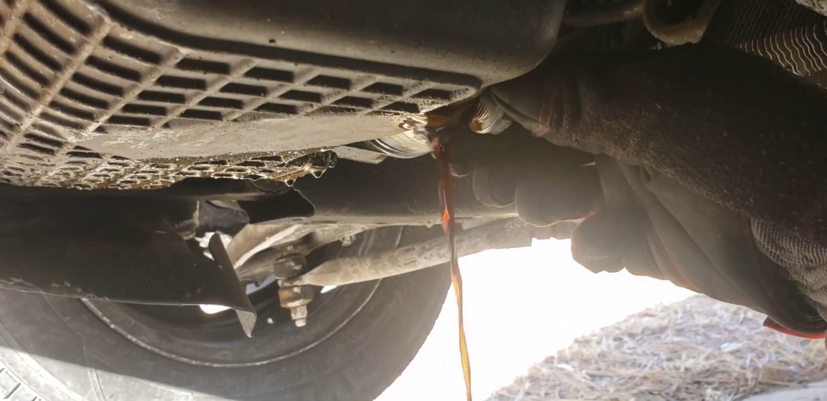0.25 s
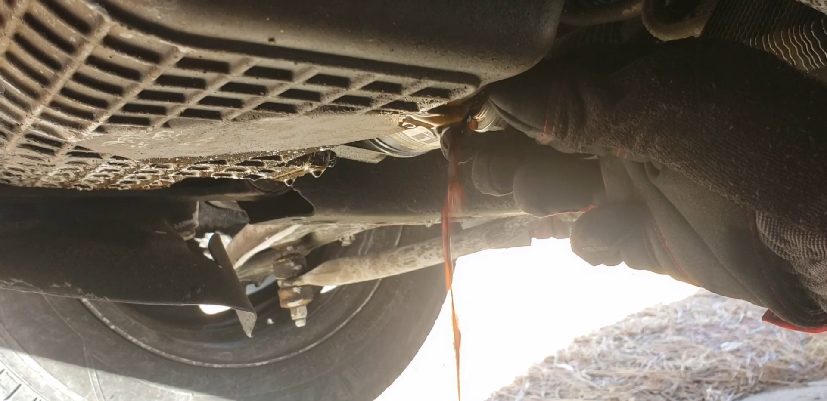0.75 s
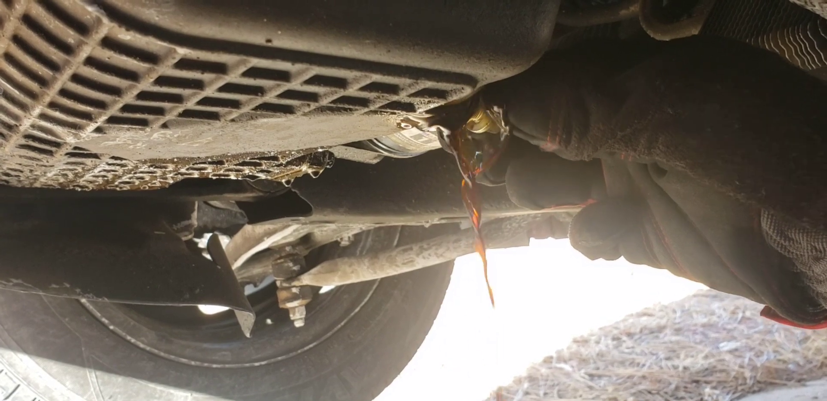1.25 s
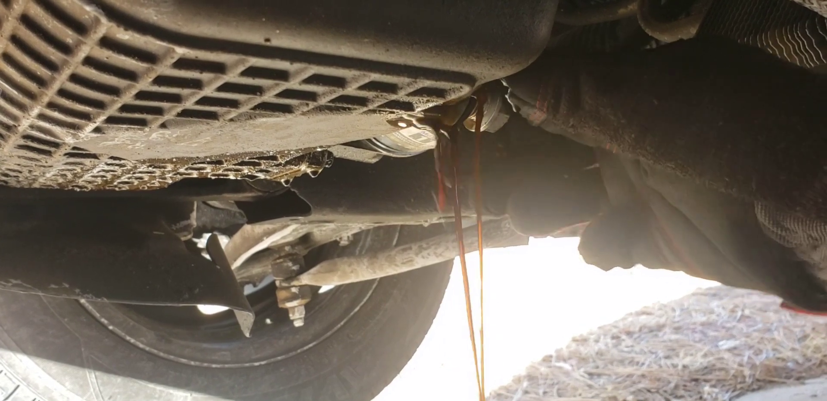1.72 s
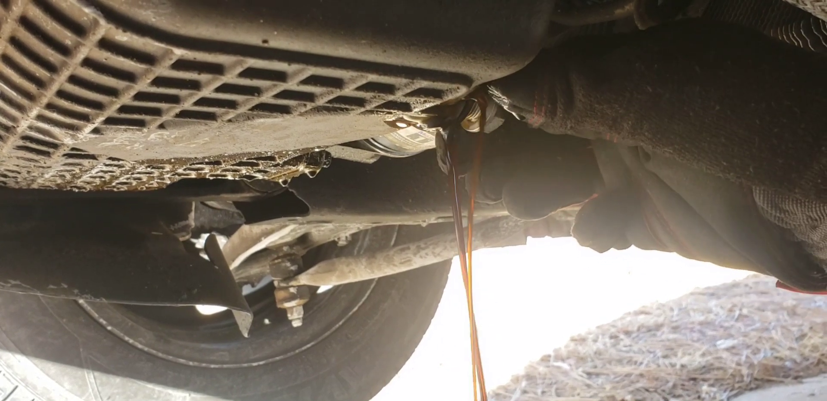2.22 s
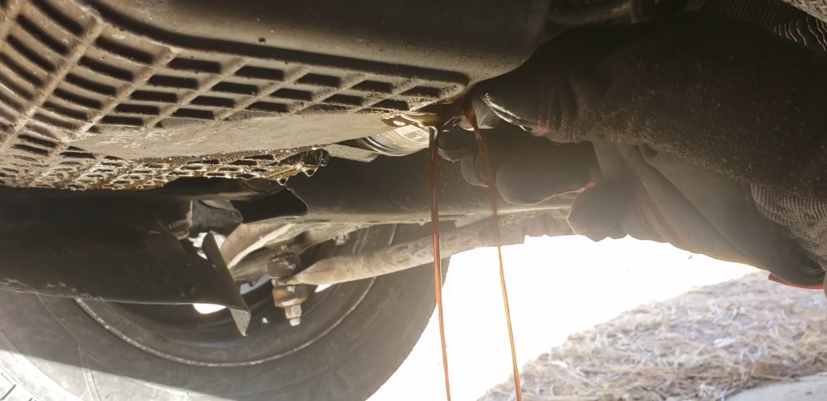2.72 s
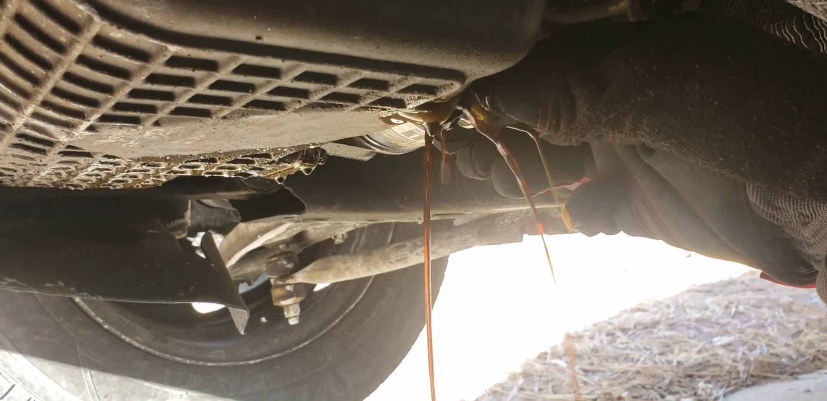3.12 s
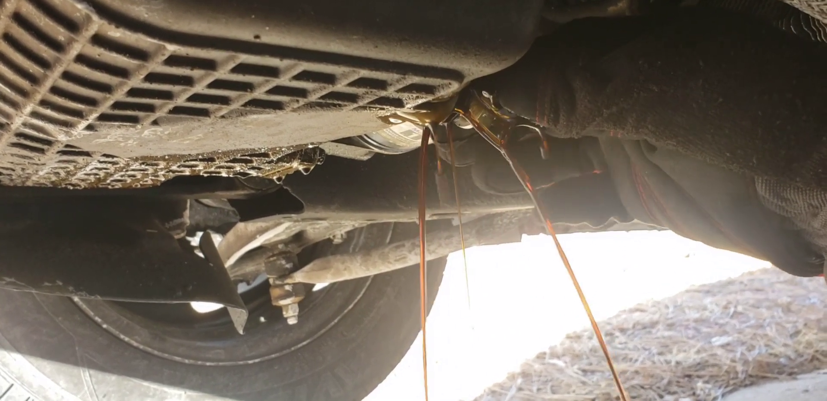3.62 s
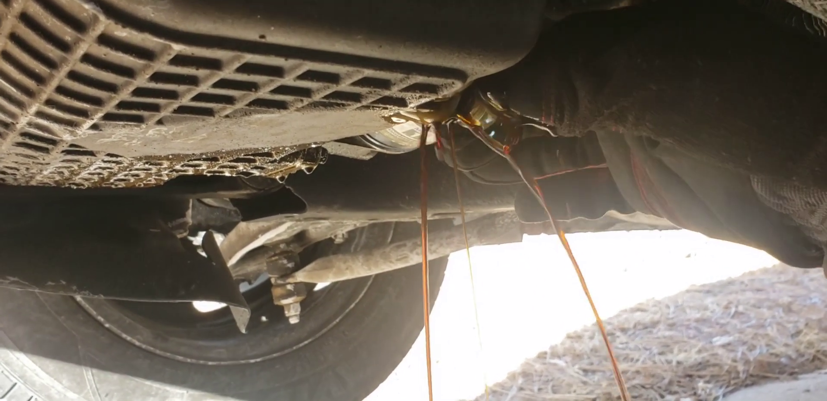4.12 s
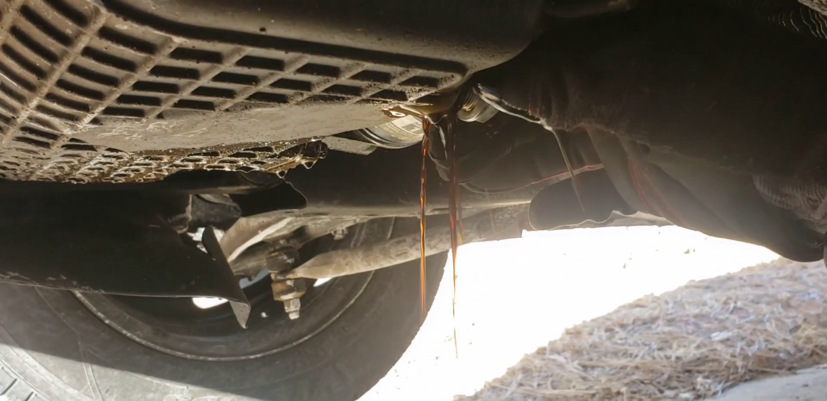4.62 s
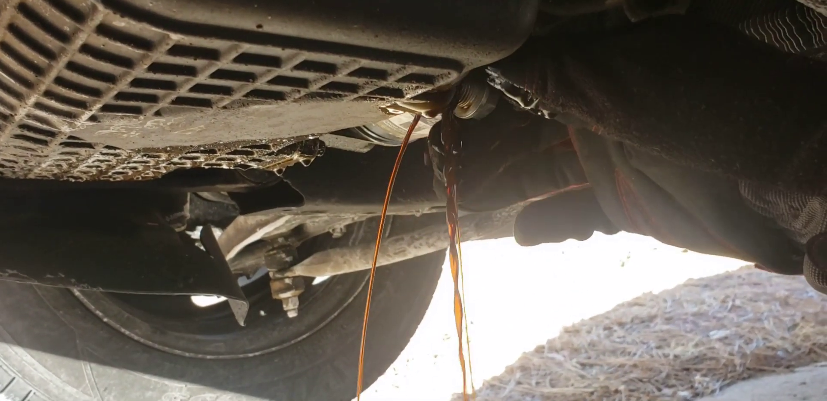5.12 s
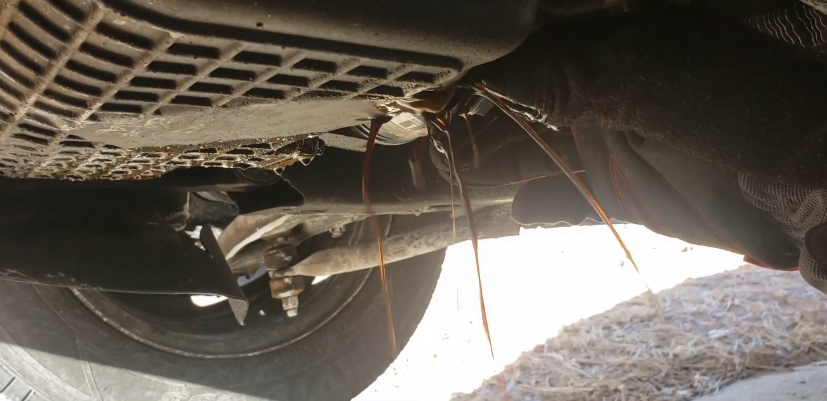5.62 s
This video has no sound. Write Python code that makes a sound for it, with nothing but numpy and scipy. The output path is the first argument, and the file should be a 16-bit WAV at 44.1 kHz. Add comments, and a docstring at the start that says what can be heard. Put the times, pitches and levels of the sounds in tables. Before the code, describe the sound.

Heard close under a car outdoors, warm oil falls in broken threads into a plastic catch pan: crisp crackle, sharp wet splats, tiny rising bubbles and dull hollow plops. Low wind rumble swells on the right microphone, peaking near 1.5 seconds and stopping abruptly. The dribble then thins, exposing single ticks and plips, before livelier splatter and bubbling return after 4.5 seconds.

```python
"""Oil draining into a catch pan

Warm oil streams from a car's drain hole into a pan, heard from under the car at a left and a right port.
Shaped noise bursts make the splats and crackle, short rising tones the bubbles, and damped modes the pan;
dense echoes stand for underbody and ground. Filtered noise makes a whistle, a faint background and the
wind, which rumbles on both ports and buffets the right one hardest early on."""
import sys
import numpy as np
from scipy import signal
from scipy.fft import rfft, irfft, next_fast_len
from scipy.io import wavfile
from scipy.ndimage import uniform_filter1d, map_coordinates

SR = 44100
rng = np.random.default_rng(int(sys.argv[2]) if len(sys.argv) > 2 else 0)


def wav_out(sig):
    """Save sig, one row per channel (or a flat mono array), as 16-bit PCM at SR to the path in sys.argv[1]."""
    wavfile.write(sys.argv[1], SR, np.round(np.clip(np.atleast_2d(sig).T, -1, 1) * 32767).astype(np.int16))


N = 258101
T = np.arange(N) / SR

# Table levels are nominal: each layer adds its own gain and echoes.
# strength of the stream's spray: (time [s], level [dB])
FLOW = [(0, -47.5), (.35, -59.5), (.58, -48.5), (.77, -52), (1.0, -53.5), (1.35, -55.5), (1.85, -60.5),
        (2.35, -61.5), (2.75, -57.5), (3.7, -57), (4.4, -53.5), (4.8, -55.5), (5.2, -54), (5.85, -61)]
# spectrum of the spray: (frequency [Hz], level [dB])
SPRAY_COLOUR = [(1800, -27), (2800, -18), (4200, -8), (5500, 1.5), (7000, -5), (8600, -15), (10000, 2.5),
                (12200, 8.5), (14000, -3), (16000, -2)]
# the biggest lumps of oil landing: (time [s], level [dB], brightest pitch [Hz])
SPLATS = [(0.02, -45, 5750), (0.062, -32, 12300), (0.181, -42, 6340), (0.196, -37, 7750),
          (0.219, -36, 13400), (0.333, -39.5, 6200), (0.423, -31, 10500), (0.516, -30.5, 13100),
          (0.547, -30, 12700), (0.618, -24.5, 15700), (0.635, -28, 6500), (0.669, -25.5, 14600),
          (0.7065, -30, 5400), (0.7303, -31, 10500), (0.76, -31.5, 12600), (0.784, -29, 12100),
          (0.86, -35, 12200), (0.926, -34, 12200), (1.029, -35.5, 10000), (1.12, -30, 12600),
          (1.157, -25, 14200), (1.201, -33, 10900), (1.227, -37.5, 9700), (1.36, -29.5, 11300),
          (1.3873, -24, 12700), (1.521, -36.5, 11800), (1.534, -36, 7200), (1.566, -34, 10700),
          (1.643, -29.5, 11800), (1.689, -36, 5430), (1.85, -41, 10800), (1.8851, -27.5, 17300),
          (1.994, -32.5, 7200), (2.088, -33, 12900), (2.13, -39.5, 11600), (2.2192, -34.5, 7560),
          (2.298, -30.5, 10500), (2.49, -39.5, 8000), (2.529, -38, 14600), (2.625, -41, 12200),
          (2.695, -37.5, 5900), (2.742, -35.5, 5440), (3.132, -34, 12800), (3.198, -39.5, 7000),
          (3.2214, -30.5, 11800), (3.339, -38, 6720), (3.381, -34, 12400), (3.447, -31.5, 12400),
          (3.476, -34.5, 10500), (3.491, -40, 10300), (3.5427, -35, 12600), (3.604, -37, 13200),
          (3.692, -33, 13400), (3.818, -34, 12200), (3.836, -40, 12100), (3.884, -38, 14100),
          (3.922, -41.5, 5530), (3.988, -41, 11950), (4.0065, -32, 12300), (4.1183, -35.5, 7100),
          (4.27, -28, 15200), (4.294, -27.5, 10000), (4.3917, -33, 10800), (4.403, -34, 11000),
          (4.442, -35, 7300), (4.473, -33.5, 12500), (4.5987, -26, 10300), (4.615, -31.5, 12400),
          (4.675, -32, 13700), (4.704, -38, 11800), (4.751, -33.5, 11000), (4.779, -37, 11700),
          (4.8116, -33, 12900), (4.895, -35, 5400), (4.912, -25.5, 14100), (4.934, -32.5, 11400),
          (4.952, -32, 11600), (4.974, -32, 15100), (5.016, -34, 11000), (5.115, -36, 12600),
          (5.21, -35, 12900), (5.252, -26, 7260), (5.414, -35, 8450), (5.456, -39, 6600),
          (5.475, -25, 11700), (5.544, -37, 13900), (5.647, -25, 13600), (5.703, -34.5, 8800),
          (5.7458, -32.5, 11800)]
# the stream lands to the right at first, then settles near the middle (left minus right)
START_PAN_DB, END_PAN_DB, SETTLE_S = -6.5, -1, 1.8
# the patter eases slightly ahead of each big splat or bubble
DIP_DB, DIP_S = -1, 0.075
# the stream breaks and little reaches the pool: (time [s], half length [s], depth [dB])
BREAKS = [(0.783, 0.16, -2), (1.342, 0.068, -26), (1.843, 0.054, -17), (2.362, 0.049, -6.5),
          (3.005, 0.37, -5.5), (3.47, 0.052, -8), (3.767, 0.067, -11.5), (4.867, 0.06, -14),
          (5.32, 0.026, -6), (5.747, 0.0067, -16)]

# the biggest bubbles bursting in the pool: (time [s], level [dB], starting pitch [Hz])
BUBBLES = [(0.063, -42, 2000), (0.456, -34.5, 4570), (0.518, -43.5, 1780), (0.587, -46.5, 2580),
           (0.636, -38, 1900), (0.638, -40.5, 4330), (0.709, -33, 5260), (0.882, -35, 1710),
           (0.906, -41, 2200), (0.922, -41, 2035), (0.991, -27.5, 4960), (1.0918, -29.5, 4060),
           (1.16, -38, 3980), (1.277, -37, 5700), (1.36, -37.5, 4370), (1.5992, -36.5, 4810),
           (1.644, -40, 2010), (1.718, -39, 4460), (2.05, -43.5, 1810), (2.3005, -39, 5230),
           (2.347, -44.5, 4970), (2.403, -46, 1880), (2.6127, -43.5, 1840), (2.696, -49, 2750),
           (2.72, -47, 1810), (2.773, -39, 1750), (2.847, -43.5, 1780), (3.0225, -48, 1650),
           (3.1232, -42, 2540), (3.1688, -41, 1660), (3.2183, -41, 1840), (3.219, -39.5, 3340),
           (3.3419, -45.5, 1850), (3.4495, -44.5, 1890), (3.5652, -40.5, 1760), (3.607, -40.5, 2030),
           (3.696, -39, 5350), (3.844, -48, 1850), (3.8611, -41, 5260), (3.892, -35, 3520),
           (4.547, -42, 1900), (4.562, -45, 2380), (4.599, -38.5, 4050), (4.633, -40, 4730),
           (4.6843, -44, 2360), (4.7512, -44, 1720), (4.779, -42, 2530), (4.897, -43, 4200),
           (4.9548, -34, 5480), (5.0163, -34.5, 3430), (5.115, -34.5, 2550), (5.1559, -39, 3250),
           (5.196, -43, 1800), (5.2166, -36.5, 1790), (5.353, -48, 1850), (5.3711, -35, 3480),
           (5.4124, -38, 3480), (5.542, -59, 1780), (5.5856, -39, 3400), (5.605, -36.5, 1800),
           (5.625, -38, 3400), (5.6508, -32.5, 5820), (5.7047, -36.5, 4350), (5.719, -44, 2050),
           (5.748, -31, 1890), (5.7695, -27.5, 2020), (5.789, -35.5, 3830)]
# a bubble's film breaks with a snap, and the thick oil damps its ring quickly
POP_DB, BUBBLE_T60_S = -16, .009
# runs of bubbles that climb in pitch: (start [s], length [s], first pitch [Hz], level [dB])
BUBBLE_RUNS = [(0.058, 0.036, 1750, -42), (0.17, 0.053, 2100, -39), (2.689, 0.12, 2800, -37),
               (4.532, 0.034, 2080, -44), (4.643, 0.053, 2080, -41), (4.866, 0.03, 3150, -45),
               (5.105, 0.067, 2550, -43), (5.424, 0.045, 2420, -42.5), (5.584, 0.074, 3420, -33.5)]
CLIMB_OCTAVES_PER_S = 11.4
# small bubbles froth up while the stream hits the pool, few on bare plastic: (time [s], level [dB])
FROTH = [(0, -54.5), (.6, -49), (.8, -60), (1.0, -51), (1.35, -50), (1.85, -63.5), (2.35, -65),
         (2.75, -52.5), (3.6, -57.5), (3.9, -56.5), (4.1, -58), (4.45, -60), (4.6, -55), (5.2, -55.5),
         (5.85, -52.5)]
# how hard the swaying stream slaps the pan: (time [s], level [dB])
SLAPS = [(0, -49.5), (.12, -59), (.25, -54.5), (.45, -56.5), (.57, -54.5), (.76, -57), (.92, -50.5),
         (1.25, -69), (1.55, -72), (1.72, -59), (1.9, -67.5), (2.2, -62.5), (2.62, -57), (3.25, -61),
         (3.75, -62), (4.16, -57), (4.4, -58), (4.6, -73.5), (5.0, -64.5), (5.55, -64.5), (5.85, -73)]
# thin threads of oil trickling into the pool: (time [s], level [dB])
TRICKLE = [(0, -58), (.75, -71), (1.0, -57), (1.3, -77), (1.9, -74), (2.35, -76), (2.68, -59), (3.0, -64),
           (3.25, -55), (3.45, -75.5), (3.75, -61.5), (4.2, -64.5), (4.85, -66), (5.2, -57), (5.85, -66.5)]
# spectrum of the trickle: (frequency [Hz], level [dB])
TRICKLE_COLOUR = [(400, -10), (800, -13), (1300, -14), (1850, 8.5), (2700, -9.5), (3500, 10.5), (5000, 13),
                  (9000, -34)]

# modes of the catch pan: (frequency [Hz], width [Hz], level [dB])
PAN_MODES = [(219, 40, -2), (345, 125, -4), (588, 50, 2), (742, 55, -10), (915, 45, -1), (1118, 60, -8),
             (1315, 90, 2), (1635, 70, 1), (1880, 110, -2.5), (2140, 110, -8), (2550, 260, -10),
             (3420, 220, -5)]
PAN_BEND = .035  # rms share by which the shifting oil bends the slapped modes
# heavy drops that knock the pan: (time [s], level [dB], starting pitch [Hz])
KNOCKS = [(0.024, -39.5, 900), (0.137, -42.5, 980), (0.173, -41.5, 970), (0.194, -38.5, 1390),
          (0.234, -38.5, 1290), (0.241, -46, 850), (0.286, -44, 935), (0.321, -38.5, 1010),
          (0.362, -41.5, 940), (0.401, -41, 1320), (0.493, -46, 1140), (0.521, -44, 1400),
          (0.558, -40.5, 970), (0.83, -41.5, 1410), (0.884, -43, 1400), (1.432, -41.5, 1730),
          (1.521, -43.5, 1650), (1.646, -46, 494), (1.743, -50.5, 595), (2.169, -41.5, 795),
          (2.22, -49.5, 1300), (2.404, -58, 1310), (2.442, -48, 563), (2.561, -46, 680),
          (2.615, -38.5, 950), (2.6367, -44, 1310), (2.773, -43, 1410), (2.93, -53, 1330),
          (3.023, -52, 1330), (3.111, -56, 930), (3.201, -48.5, 1270), (3.2456, -47.5, 1170),
          (3.283, -49.5, 1250), (3.469, -48, 1280), (3.618, -46, 570), (3.792, -51, 573), (3.836, -47, 560),
          (3.889, -46, 600), (3.933, -43.5, 596), (4.014, -42.5, 585), (4.121, -37, 570),
          (4.125, -42, 1330), (4.146, -47, 565), (4.198, -40, 1940), (4.263, -50, 1210),
          (4.307, -43.5, 567), (4.343, -45, 1300), (4.354, -45.5, 550), (4.405, -43, 594),
          (4.517, -43, 580), (5.003, -49.5, 1300), (5.061, -50, 576), (5.255, -50, 580), (5.414, -50, 580),
          (5.43, -44, 1280), (5.543, -39, 1600), (5.685, -48, 560), (5.751, -46, 690)]
KNOCK_SNAP_DB = 2  # the first contact of a heavy drop, over its plop
# once the pool is deep enough, air pockets fold into it at random
GLUGS_FROM_S, GLUG_DB, GLUG_HZ, GLUG_OCTAVES = 3.6, -49, 175.5, 0.97
# the stream drums on the pan's bottom: (start [s], end [s], level [dB])
ON_BOTTOM = (3.57, 4.46, -65.5)
DRUM_FADE_DB_PER_S = 146

# a faint thin whistle that sinks in pitch: (time [s], pitch [Hz], level [dB])
WHISTLE = [(.7, 1650, -78), (.85, 1603, -62), (.96, 1623, -61), (1.07, 1650, -62), (1.13, 1595, -58),
           (1.18, 1650, -66), (1.24, 1490, -86), (1.28, 1338, -61), (1.315, 1395, -63), (1.36, 1360, -63),
           (1.41, 1304, -88)]
WHISTLE_WANDER_HZ, WHISTLE_FLUTTER_DB = 84, -1
# one long gust on the right port that builds and stops dead: (time [s], level [dB])
LONG_GUST = [(0, -36), (.35, -42), (.57, -45), (.66, -29), (.9, -31.5), (1.0, -44), (1.08, -32.5),
             (1.2, -26.5), (1.33, -23.5), (1.545, -21.5), (1.553, -71), (1.8, -86)]
# puffs on the right port, within that gust and after it: (peak time [s], level [dB], half length [s])
PUFFS = [(0.435, -31, 0.037), (0.524, -28, 0.04), (0.598, -26.5, 0.026), (0.747, -25.5, 0.062),
         (0.893, -20, 0.039), (1.103, -20.5, 0.012), (1.243, -19.5, 0.023), (1.324, -15, 0.017),
         (1.447, -15, 0.03), (1.539, -14, 0.0049), (3.448, -40, 0.075), (3.97, -40, 0.075),
         (4.23, -52, 0.11), (4.404, -40, 0.026), (4.721, -38, 0.032), (5.074, -49, 0.052),
         (5.382, -40, 0.046), (5.579, -37.5, 0.015), (5.85, -41.5, 0.057)]
PUFF_EDGE_DB = -9.5  # a half length away from the peak
# the hardest buffet: (time [s], peak level [dB], half width at half height [s])
BUFFET = (1.4626, -12.5, 0.0012)
# the breeze on the left port, rising and easing: (time [s], level [dB])
BREEZE = [(0, -47), (.85, -42.5), (1.1, -38), (1.8, -47.5), (2.1, -44), (2.55, -49), (3.25, -51),
          (3.42, -45.5), (3.7, -49), (5.85, -45.5)]
# spectrum of the wind's eddies: (frequency [Hz], level [dB])
WIND_COLOUR = [(15, -34), (28, -10.5), (42, 0), (62, 7), (110, -0.5), (170, -14.5), (250, -21.5),
               (400, -34.5), (700, -42), (1500, -59)]
# spectrum of the outdoor background: (frequency [Hz], level [dB])
AIR_COLOUR = [(30, -13), (80, -19), (180, -1), (350, 2), (700, -6.5), (1500, -52), (4000, -21),
              (16000, -15)]
AIR_DB = -64
TOP_HZ = 16000


def spray(level_db):
    """Random impacts: droplets of varied pitch and echoes over a fine, sharp crackle and fizz."""
    drops = np.zeros((2, N))
    for s, pitch, size, side in scatter(count=620, size=4):
        tick = burst(5000 + 10500 * pitch, width_hz=1740, decay_s=0.00025, skirt_db=-16.5, snap_db=9.5)
        echoed = underbody(tick, wet_db=3, t60=0.045)
        add(drops, s, echoed * undb(11.9 * size ** 2), 8 * (side - .5))
    grain_db = 11.3 * walk(110) + 2 * rng.standard_normal(N)
    fizz = colour(rng.standard_normal((2, N)) * undb(grain_db), SPRAY_COLOUR)
    pricks = patter(rate=420, spread_db=6, clump_db=3, clump_rate=90)
    crackle = underbody(colour(pricks, SPRAY_COLOUR), wet_db=-2, t60=.012)
    mix = even(drops) * undb(1.0) + even(fizz) * undb(-2.5) + even(crackle) * undb(-0.5)
    return mix * undb(level_db)


def splats():
    """Impulsive impact: lumps of the broken stream slap down, each on a new spot with new echoes."""
    out = np.zeros((2, N))
    for s, db, hz in SPLATS:
        slap = burst(hz, width_hz=1100, decay_s=0.00045, skirt_db=-16.5, snap_db=23.0)
        echoed = underbody(slap, wet_db=11.5, t60=0.051)
        add(out, s + 0.00083, echoed * undb(db + 15.5), landing_side(s))
    return out


def bubbles():
    """Bubble resonance: a snap, then a brief rising ring; a coiling thread traps runs of smaller ones."""
    out = np.zeros((2, N))
    for s, db, hz in BUBBLES:
        tone = ring(hz, cycles=BUBBLE_T60_S * hz, glide=0.047)
        skin = undb(-6) * np.abs(tone) * rng.standard_normal(len(tone))
        skin[0] += undb(POP_DB) * np.sqrt(len(tone)) / 2
        echoed = underbody(tone + skin, wet_db=5.5, t60=0.052)
        add(out, s, echoed * undb(db + 3.5), landing_side(s) - 1.2)
    for start, length, first_hz, db in BUBBLE_RUNS:
        # four bubbles, one at a random moment in each quarter
        for age in length * (np.arange(4) + rng.random(4)) / 4:
            hz = first_hz * 2 ** (CLIMB_OCTAVES_PER_S * age)
            blip = ring(hz, cycles=18, glide=0.1)
            blip[0] += undb(POP_DB) * np.sqrt(len(blip))
            echoed = underbody(blip, wet_db=9, t60=0.087)
            add(out, start + age, echoed * undb(db + 2.8 * rng.standard_normal()))
    return out


def froth(level_db):
    """Superposed bubble resonances: a swarm of small bubbles, each a short rising blip."""
    out = np.zeros((2, N))
    for s, pitch, size, side in scatter(count=600, size=4):
        tone = ring(1900 * 3.8 ** pitch, cycles=58, glide=0.041)
        blip = underbody(tone, wet_db=3, t60=0.06)
        add(out, s, blip * undb(5.3 * size ** 2 + 6 * pitch), 6 * (side - .7))
    return even(out) * undb(level_db - 4.0)


def slosh(level_db):
    """Impact excitation of modes: the stream's slaps ring the pan, among larger, gurgling bubbles."""
    gurgle = np.zeros((2, N))
    for s, pitch, size in scatter(count=1000, size=3):
        tone = ring(800 * 2.5 ** pitch, cycles=14, glide=0.25)
        blip = underbody(tone, wet_db=2, t60=0.04)
        add(gurgle, s, blip * undb(11.7 * size ** 2 + 1.5 * pitch))
    slaps = patter(rate=340, spread_db=2.5, clump_db=4.5, clump_rate=49)
    near = []
    for _ in range(2):  # each slap reaches the two ports with a strength of its own
        strength_db = 8.2 * np.clip(rng.standard_normal(N), -1.5, 1.5)
        near.append(pan(slaps * undb(strength_db)))
    echoed = underbody(pan(slaps), wet_db=9, t60=0.097)
    rung = bend(even(np.array(near)) + undb(-0.5) * even(echoed), depth=PAN_BEND, rate=14)
    pool = rung + undb(0.5) * even(gurgle)
    return even(pool) * undb(level_db + 0.5) * undb([[-1.2], [1.2]])


def trickle(level_db):
    """Bubble resonance on a tiny scale: thin threads fold into the pool as dense, crisp plips."""
    out = np.zeros((2, N))
    for s, pitch, size, side in scatter(count=800, size=4):
        plip = ring(1000 * 3.5 ** pitch, cycles=11, glide=.25)
        plip[0] += undb(-9.0)
        echoed = underbody(plip, wet_db=0, t60=.025)
        add(out, s, echoed * undb(16 * size ** 2 + 4 * pitch), 5 * (side - .6))
    return even(colour(out, TRICKLE_COLOUR), span_s=.12) * undb(level_db)


def knocks():
    """Selective resonance: plops ring the pan most near their own pitch; trapped air adds random glugs."""
    out = np.zeros((2, N))
    for s, db, hz in KNOCKS:
        plop = np.pad(ring(hz, cycles=8, glide=.14), (0, 2500))  # room for the pan to ring on
        plop[0] += undb(KNOCK_SNAP_DB)
        thump = pan(plop)
        sound = undb(-3.0) * plop + undb(-1.5) * thump / np.abs(thump).max()
        add(out, s, underbody(sound, wet_db=3.0, t60=0.038) * undb(db + 1.0))
    for s, pitch, size in scatter(count=130, size=3):
        if s > GLUGS_FROM_S:
            glug = ring(GLUG_HZ * 2 ** (GLUG_OCTAVES * pitch), cycles=8.9, glide=0.18)
            add(out, s, glug * undb(GLUG_DB + 10 * (size - .5) - 3 * pitch))
    return out


def drumming():
    """Forced resonance: uneven beats on bare plastic drive one mode; shifting oil bends its pitch."""
    beats = patter(rate=400, spread_db=2, clump_db=2, clump_rate=60)
    bottom = resonate(resonate(beats, 586, 61), 554, 190)
    bent = bend(bottom, depth=0.015, rate=29)
    echoed = underbody(bent, wet_db=-6, t60=0.07)
    return even(echoed, span_s=0.13) * spell(*ON_BOTTOM) * undb(0.5)


def whistle():
    """Narrow-band noise: slow random amplitudes on a carrier whose pitch sinks overall."""
    s, hz, db = np.transpose(WHISTLE)
    waver = walk(WHISTLE_WANDER_HZ) + 1j * walk(WHISTLE_WANDER_HZ)
    phase = 2 * np.pi * np.cumsum(np.interp(T, s, hz)) / SR
    tone = np.real(waver * np.exp(1j * phase))
    level_db = np.interp(T, s, db) + WHISTLE_FLUTTER_DB * (walk(47.0) - 1.0)
    sounding = (T > s[0]) * (T < s[-1])
    return underbody(tone * undb(level_db) * sounding, wet_db=18, t60=0.042)


def ports():
    """Local turbulence: each port has its own wind; the hardest gust flaps against the right one."""
    s, db, half_width = BUFFET
    slap = undb(db) / (1 + ((T - s) / half_width) ** 2) * np.cos(2 * np.pi * 300 * (T - s))
    flutter = unit(resonate(resonate(rng.standard_normal(N), 190, 240), 256, 960))
    flutter = flutter * np.exp(-((T - s + 0.0019) / 0.006) ** 2)
    puffs = [peak_db + PUFF_EDGE_DB * np.abs(T - at) / half for at, peak_db, half in PUFFS]
    gusts_db = np.max([curve(LONG_GUST)] + puffs, axis=0)
    right = wind(gusts_db, harsh_db=-8.0) + slap + undb(-29) * flutter
    left = wind(curve(BREEZE), harsh_db=-2.5)
    return np.array([left, right])


def wind(level_db, harsh_db, hold_s=0.15):
    """Turbulence noise: the stronger the gust, the larger its share of small fast eddies, in lumps."""
    eddies = even(colour(rng.standard_normal(N), WIND_COLOUR), hold_s)
    lumps = undb(3 * np.clip(walk(30), -1.5, 1))
    fast = rng.standard_normal(N)
    for hz, width_hz in [(152, 135), (162.6, 70), (162, 196)]:
        fast = resonate(fast, hz, width_hz)
    fast = even(fast, hold_s) * lumps
    return undb(level_db) * (eddies + undb(harsh_db + 5.0 + 0.29 * level_db) * fast)


def air():
    """Partial coherence: faint outdoor background noise, partly alike at both ports."""
    noise = rng.standard_normal((2, N)) + 1.14 * rng.standard_normal(N)
    return unit(colour(noise, AIR_COLOUR)) * undb(AIR_DB + 2.2 * walk(4.2))


def burst(hz, width_hz, decay_s, skirt_db, snap_db):
    """Impact noise of flattening oil: a snap, then fading micro-clicks, resonant at hz; energy 1."""
    t = np.arange(700) / SR
    uneven = undb(5.4 * rng.standard_normal(len(t)))
    clicks = rng.standard_normal(len(t)) * uneven * np.exp(-t / decay_s)
    clicks /= np.linalg.norm(clicks)
    clicks[0] += undb(snap_db)
    sound = resonate(clicks, hz, width_hz) + undb(skirt_db) * resonate(clicks, 10200, 9200)
    return sound / np.linalg.norm(sound)


def ring(hz, cycles, glide):
    """Damped oscillation: a tone that loses 60 dB in about so many cycles while its pitch rises."""
    age = np.arange(int(cycles * SR / hz) + 2) * hz / SR / cycles  # 0 to 1
    phase = 2 * np.pi * cycles * age * (1 + glide * age / 2)
    return np.sin(phase) * np.exp(-np.log(1000) * age)


def pan(x):
    """Modal superposition: the catch pan rings in damped modes, neighbours in opposite phase."""
    out = 0
    for k, (hz, width, db) in enumerate(PAN_MODES):
        out = out + (-1) ** k * undb(db) * resonate(x, hz, width)
    return out


def bend(x, depth, rate):
    """Frequency modulation by varying delay: oil shifting in the pan bends its pitches at random."""
    lead = np.cumsum(depth * walk(rate))
    drift = uniform_filter1d(lead, int(3 * SR / rate))
    place = np.arange(N) + lead - drift
    return np.array([map_coordinates(port, [place], order=1, mode="mirror") for port in np.atleast_2d(x)])


def underbody(x, wet_db, t60, lag_s=.00006):
    """Reverberation: direct sound, slightly later at the left port, then echoes of car and ground."""
    t = np.arange(2500) / SR
    echoes = rng.standard_normal((2, len(t))) * undb(-60 * t / t60) * (t > .001)
    response = undb(wet_db) * echoes / np.sqrt(np.sum(echoes ** 2, axis=1, keepdims=True))
    response[0, int(lag_s * SR)] += 1
    response[1, 0] += 1
    echoed = signal.fftconvolve(np.atleast_2d(x), response, axes=1)[:, :N]
    return echoed / np.sqrt(1 + undb(2 * wet_db))


def patter(rate, spread_db, clump_db, clump_rate):
    """Random impulse process: impacts of very unequal size whose strength swells in clumps."""
    hit = rng.random(N) < rate / SR
    size = undb(spread_db * np.minimum(rng.standard_normal(N), 2)) * rng.choice([-1, 1], N)
    return hit * size * undb(clump_db * np.clip(walk(clump_rate), -2, 2))


def scatter(count, size):
    """Jittered timing: rows (time [s], chance, ..), one near each of count evenly spaced moments."""
    rows = rng.random((count, size))
    slot = (np.arange(count) + 4 * rows[:, 0] - 2) % count
    rows[:, 0] = slot * N / SR / count
    return rows


def landing_side(s):
    """Level difference between ports: left minus right [dB] where the stream lands at time s."""
    return END_PAN_DB + (START_PAN_DB - END_PAN_DB) * np.exp(-(s / SETTLE_S) ** 2)


def dips():
    """Level dip [dB] that deepens exponentially towards each big splat or bubble and ends there."""
    due = np.sort([s for s, db, hz in list(SPLATS) + list(BUBBLES)] + [np.inf])
    wait = due[np.searchsorted(due, T)] - T
    return DIP_DB * np.exp(-wait / DIP_S)


def spell(start, end, db):
    """Exponential fades: a gain that holds from start to end and falls away on either side."""
    outside_s = np.maximum(np.maximum(start - T, T - end), 0)
    return undb(db - DRUM_FADE_DB_PER_S * outside_s)


def undb(db):
    """Logarithmic level: decibels to amplitude gain."""
    return 10 ** (np.asarray(db) / 20)


def curve(rows):
    """Linear interpolation: rows (time [s], value) joined by straight lines."""
    return np.interp(T, *np.transpose(rows))


def unit(x):
    """Normalization: scale to rms 1."""
    return x / np.sqrt(np.mean(x ** 2))


def even(x, span_s=0.93):
    """Level compensation: hold the slow level near rms 1, leaving the quick grain."""
    window = signal.windows.hann(int(2 * span_s * SR))
    power = signal.fftconvolve(np.mean(np.atleast_2d(x) ** 2, axis=0), window, "same")
    weight = signal.fftconvolve(np.ones(N), window, "same")
    return x / np.sqrt(np.maximum(power / weight, 1e-12))


def walk(rate):
    """Smoothed random steps: a wander of rms 1 at about rate steps per second."""
    k = max(int(SR / rate), 1)
    steps = rng.standard_normal(4096)[np.arange(N) // k % 4096]
    return unit(uniform_filter1d(uniform_filter1d(steps, k), k // 2 + 1))


def colour(x, points):
    """Minimum-phase filtering: a causal filter through (frequency [Hz], level [dB]) points."""
    size = next_fast_len(N + 8192)
    hz, db = np.transpose(points)
    f = np.maximum(np.arange(size // 2 + 1) * SR / size, 1)
    log_gain = np.interp(np.log(f), np.log(hz), db) * np.log(10) / 20
    cepstrum = irfft(log_gain, size)
    # folding the cepstrum onto positive time makes the filter causal
    cepstrum[1:size // 2] *= 2
    cepstrum[size // 2 + 1:] = 0
    return irfft(rfft(x, size) * np.exp(rfft(cepstrum)), size)[..., :N]


def resonate(x, hz, width_hz):
    """Simple resonance: one peak, gain 1 at its centre."""
    hz = min(hz, .42 * SR)
    return signal.lfilter(*signal.iirpeak(hz, hz / min(width_hz, SR / 3), SR), x)


def add(out, s, sound, pan_db=0):
    """Superposition: mix a short sound into a stereo track at time s, pan_db louder on the left."""
    i = int(np.clip(s * SR, 0, N - 1))
    sound = np.atleast_2d(sound)[:, :N - i]
    out[:, i:i + sound.shape[1]] += sound * undb([[pan_db / 2], [-pan_db / 2]])


def scene():
    """Superposition of all sources; the patter dips before big splats and bubbles, and thins at breaks."""
    dip_db = dips()
    pool_db = dip_db + sum(depth * np.exp(-((T - s) / half) ** 2) for s, half, depth in BREAKS)
    oil = spray(curve(FLOW) + dip_db) + splats() + bubbles()
    oil = oil + froth(curve(FROTH) + pool_db) + slosh(curve(SLAPS) + pool_db)
    oil = oil + trickle(curve(TRICKLE) + pool_db)
    struck_pan = knocks() + drumming()
    return oil + struck_pan + whistle() + ports() + air()


def record(dry):
    """Band limiting: the recorder's steep low-pass cuts the top."""
    return signal.sosfilt(signal.ellip(10, .2, 80, TOP_HZ, fs=SR, output="sos"), dry)


dry = scene()
out = record(dry)
wav_out(out)
```